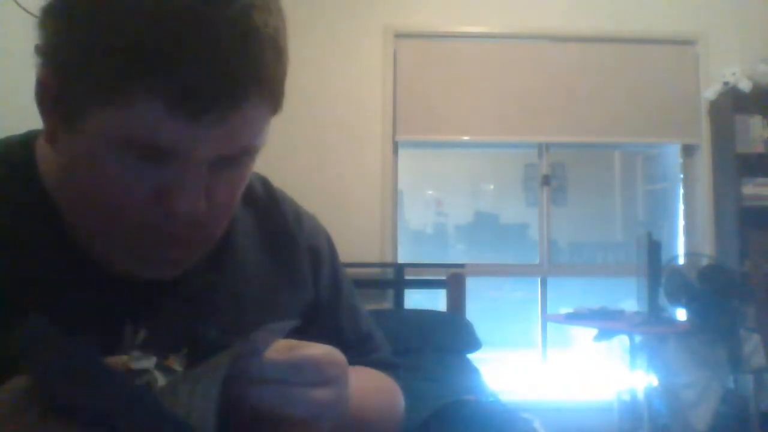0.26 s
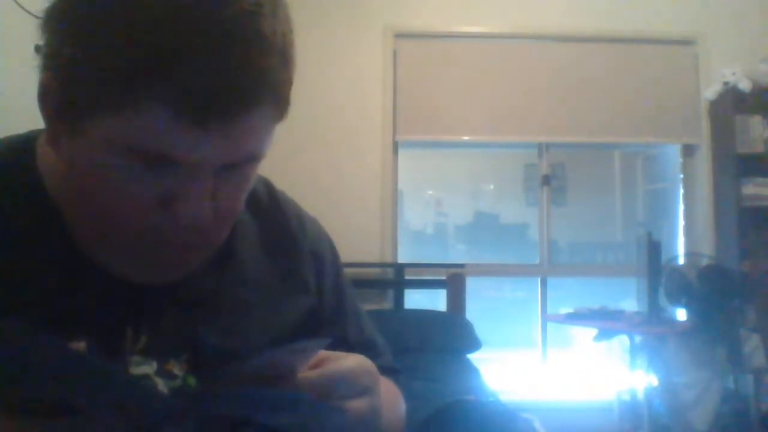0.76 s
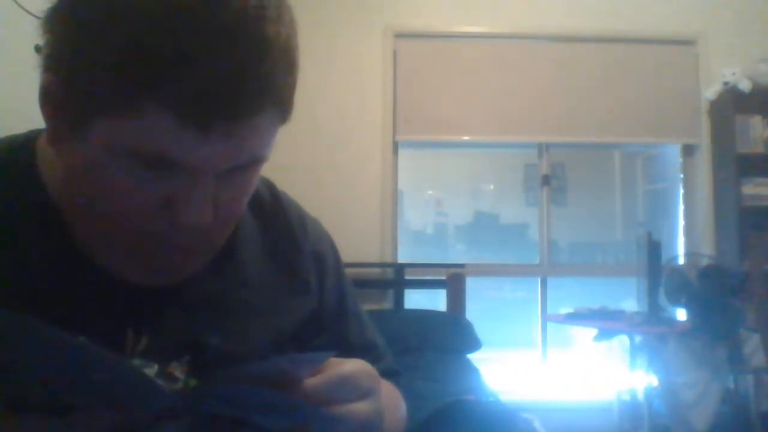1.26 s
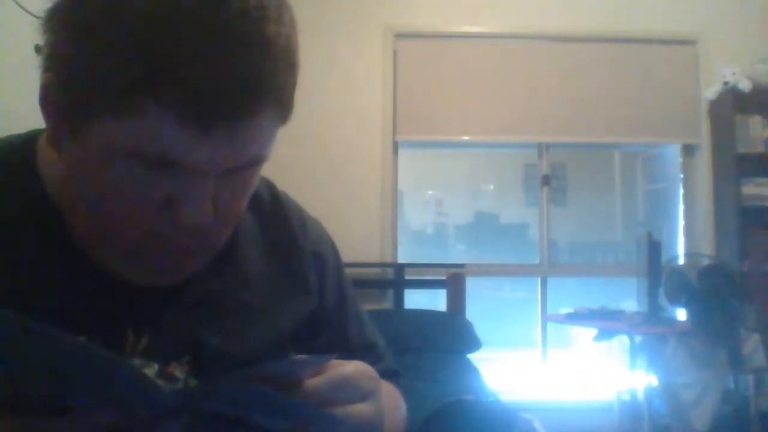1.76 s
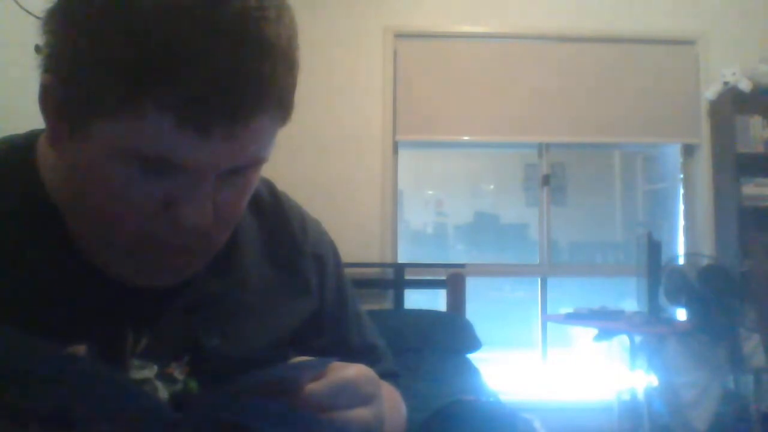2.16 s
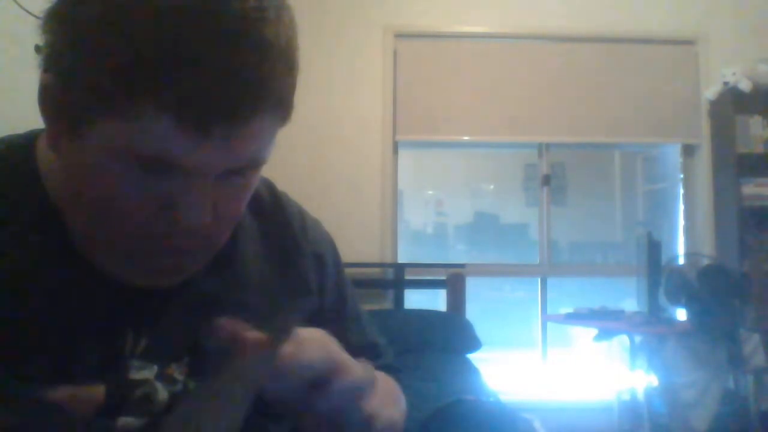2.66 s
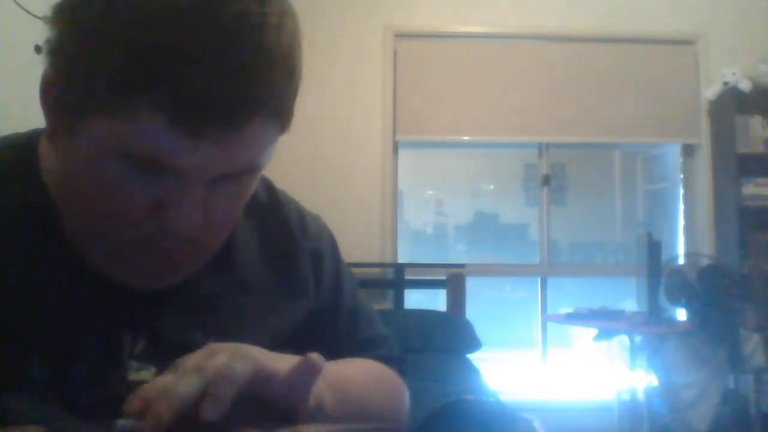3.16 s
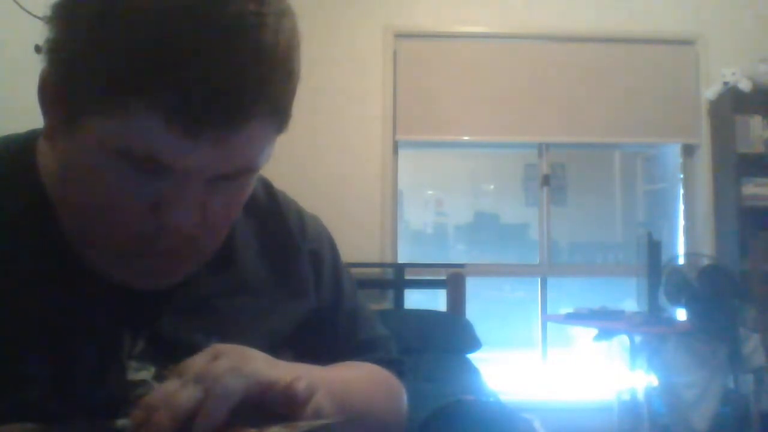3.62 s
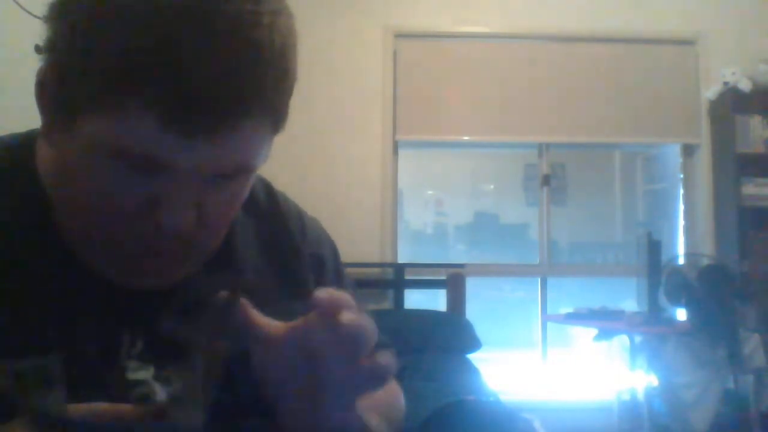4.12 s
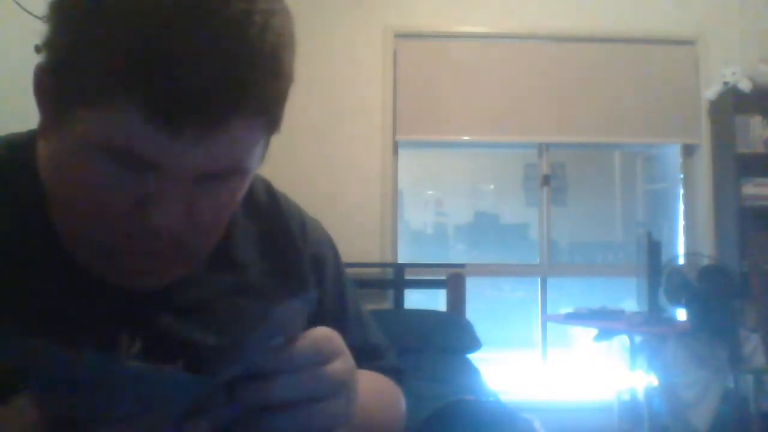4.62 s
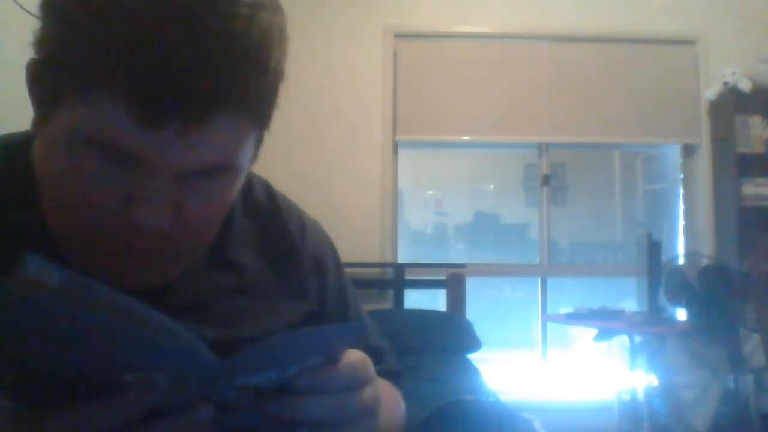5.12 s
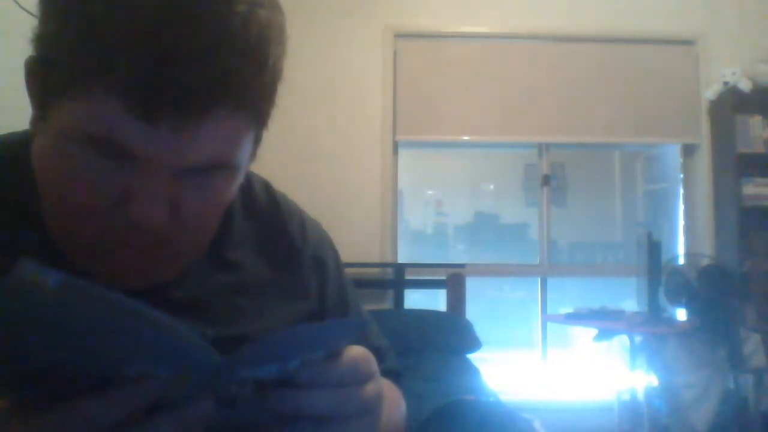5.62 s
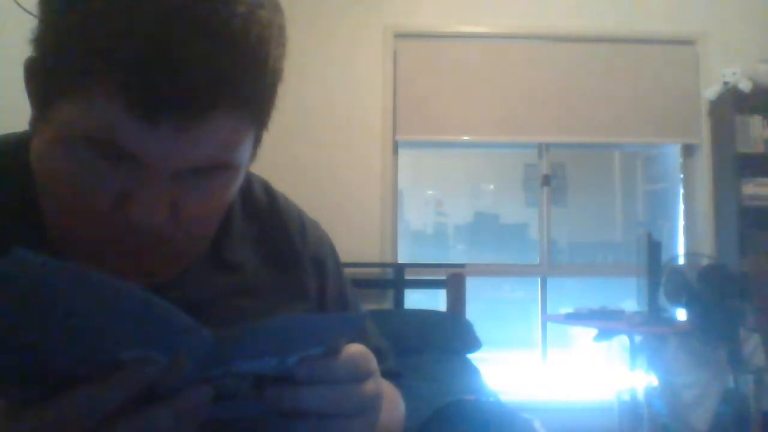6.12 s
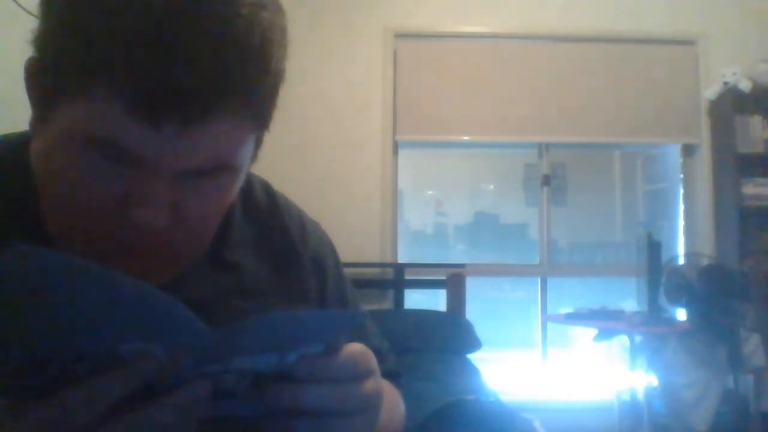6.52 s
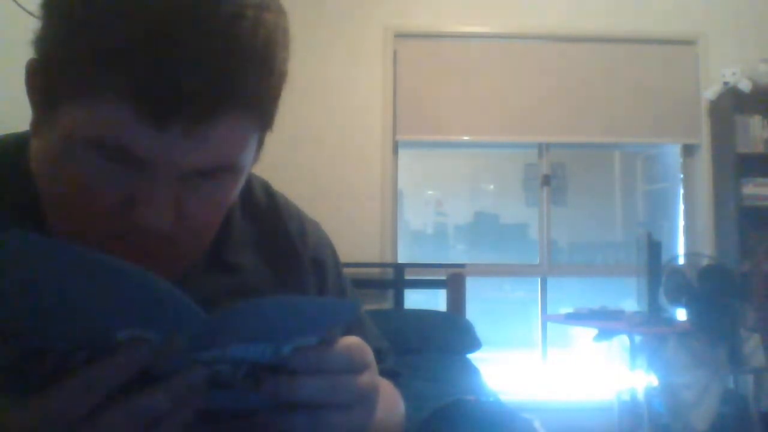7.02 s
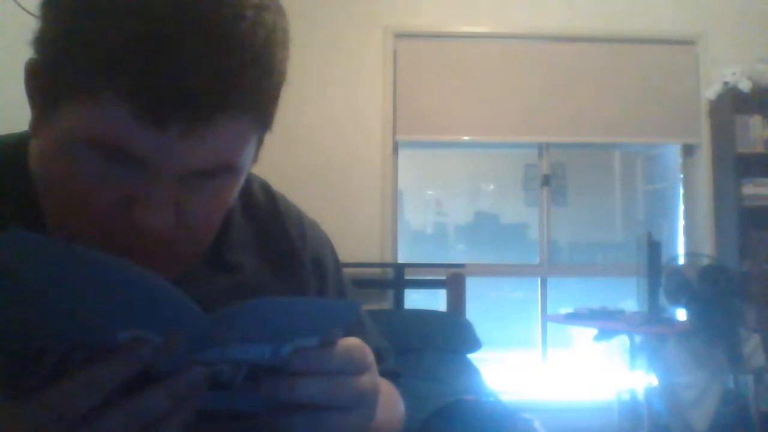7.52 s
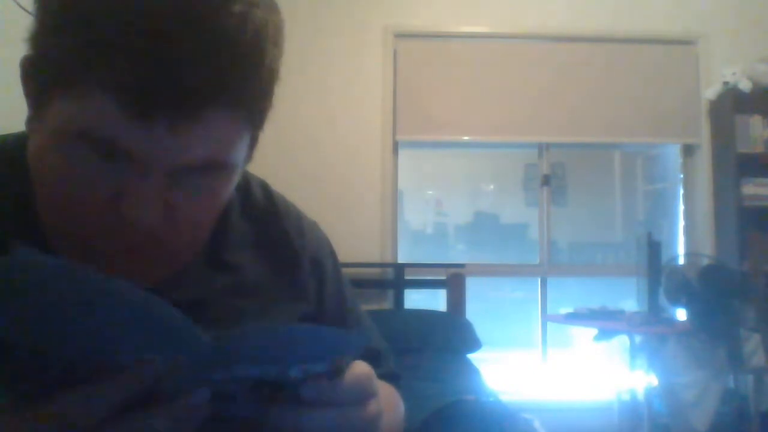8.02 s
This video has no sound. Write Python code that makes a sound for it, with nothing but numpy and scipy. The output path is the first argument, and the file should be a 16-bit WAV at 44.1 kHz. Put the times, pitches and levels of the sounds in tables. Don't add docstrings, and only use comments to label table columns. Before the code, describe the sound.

A continuous low computer hum with a slow regular throb and a gritty, fluttering fan rattle, taken by a built-in microphone in the same case. Short sags in the hum recur throughout. Tiny papery crinkles appear mainly in the first five seconds as magazine pages are handled, with a few dull desk bumps. Faint distant engine, very high whine and soft hiss remain in the background.

```python
import sys
import numpy as np
from scipy import signal
from scipy.fft import rfft, irfft
from scipy.io import wavfile
from scipy.ndimage import uniform_filter1d

SR = 44100
rng = np.random.default_rng(int(sys.argv[2]) if len(sys.argv) > 2 else 0)


def put_to_file(sound):
    columns = np.atleast_2d(sound).T
    safe = np.clip(columns, -1, 1)
    whole_steps = np.round(safe * 32767)
    wavfile.write(sys.argv[1], SR, whole_steps.astype(np.int16))


def volts(x):
    e = np.asarray(x, float) / 20
    return 10 ** e


N = 365148
TIME = np.arange(N) / SR

FAN_HZ = 59.63
# (time [s], lead [turns])
FAN_LEAD = [(0.0, -.023), (.2, -.023), (.6, -.053), (1.6, .042), (1.8, .044), (2.2, .042), (2.75, .012),
            (3.6, .088), (4.0, .068), (4.6, .041), (5.0, -.019), (5.4, -.057), (5.6, -.055), (5.85, -.037),
            (6.3, -.047), (6.7, -.08), (7.6, -.085), (8.28, -.009)]
# (multiple of the turning rate, level [dB rms], share that follows the loose bearing [0-1])
FAN_ORDERS = [(1, -51, 0), (2, -60, .2), (3, -64, 1), (4, -60.5, 1), (5, -59.5, .5), (6, -41.5, 1),
              (7, -54, 1), (8, -55.5, 1), (9, -54, .2), (10, -60.5, 1), (11, -68, .5), (12, -58, .2),
              (13, -59.5, 1), (14, -62.5, 1), (15, -56.5, 1), (16, -60.5, 1), (17, -67.5, .7),
              (18, -67.5, .7), (19, -71, .7), (20, -70, .7), (32, -71, .1), (35, -75, .1), (38, -73, .1),
              (43, -76, .1)]
MOUNT_ORDER, LID_ORDER, LID_LAG_TURNS = 5, 14, .7
PLAY_TURNS, PLAY_HZ = 0.00033, 24
BUZZ_FOLLOWS = 0.14

# (time [s], length [s], flutter [Hz])
STUMBLES = [
    (0.674, 0.021, 26.8),
    (1.15, 0.036, 26.6),
    (1.963, 0.05, 24),
    (2.754, 0.045, 26),
    (3.537, 0.033, 24),
    (4.941, 0.055, 23.5),
    (5.614, 0.055, 24),
    (7.012, 0.064, 24.3),
]
STUMBLE_PLAY_TURNS = .027
STUMBLE_LOSS = .55
STUMBLE_SLACK = .45
FLUTTER_ABOVE_DB, FLUTTER_BELOW_DB, FLUTTER_GLIDE = -45.5, -51, 340

# (centre [Hz], width [Hz])
PANELS = [(230, 60), (362, 60), (445, 40), (575, 60), (870, 80), (1080, 150), (1410, 200), (2570, 60),
          (4140, 330), (4400, 150)]
PANEL_DB = [-69.5, -56.5, -68, -62.5, -60, -64.5, -61, -68, -72, -100]

# (time [s], peak level [dB])
HARD_KNOCKS = [(.005, -37.6), (.374, -37.2), (.576, -37.2), (1.715, -37.3), (1.799, -35.8), (1.832, -36.4),
               (2.05, -36.7), (2.772, -36.7), (3.525, -36), (3.995, -37.2), (4.163, -36.7), (4.197, -36.9),
               (4.247, -36.2), (4.448, -37.2), (4.499, -36.6), (4.666, -36.9), (4.751, -37.3),
               (4.868, -37.3), (5.003, -37), (5.506, -37.1), (5.641, -36.9), (5.875, -36.2), (6.53, -37.2),
               (7.05, -36.7), (7.385, -36.1), (7.62, -37), (7.821, -37.3), (7.988, -37.1), (8.089, -36.4),
               (8.122, -36.8)]
# (start [s], end [s])
SETTLED = [(.06, .26), (2.07, 2.57), (3.59, 3.85), (5.02, 5.28), (6.3, 6.42), (6.55, 6.68), (7.11, 7.33),
           (7.42, 7.5)]
USUAL_KNOCK_DB, MISSED_KNOCK_DB, LOOSE_TOP_DB = -43.5, -58, -38
LOOSE_SPREAD, SETTLED_SPREAD = .5, .12
REBOUND, REBOUND_LATE = .7, .3
KNOCK_TURN, KNOCK_GAIN_DB = .285, 28.5
KNOCK_JITTER_S, KNOCK_RISE_S = .00007, .0007

# (centre [Hz], width [Hz])
CASE = [(1915, 130), (2260, 220), (2570, 110), (2950, 260), (3160, 200), (3510, 200), (4150, 140),
        (5200, 300)]
# (after a hard knock [dB], after a soft knock [dB])
CASE_DB = [(-5.5, -2), (-4.5, -11.5), (-1, -6), (-6, -2), (-8, -0.5), (-6.5, -8), (-10.5, -22), (-22, -28)]
CASE_LATE_S = [0, 0, 0, .001, .0015, 0, .002, 0]
# (delay [s], level [dB])
CASE_ECHOES = [
    (.00288, -4),
    (.0047, -5.5),
    (.011, -10),
]
# (centre [Hz], width [Hz], delay [s], level [dB])
LID = [
    (865, 220, 0.00459, -5.5),
    (1300, 750, 0.00427, -29),
]

# (frequency [Hz], level [dB per Hz])
AIR = [(20, -81.5), (60, -81.5), (140, -81.5), (300, -90.5), (500, -83.5), (660, -85.5), (1000, -82.5),
       (1250, -87), (1750, -90.5), (2400, -87.5), (3500, -100), (3750, -110), (4600, -116)]
RATTLE_ABOVE_HZ, RATTLE_FOLLOWS = 1940, 0.44

SPINDLE_HZ = [
    86.672,
    90.13,
    99.94,
]
SPINDLE_DB = [-47, -48, -69]
IN_STEP_S = 0.0622

# (time [s], peak level [dB], frequency [Hz])
THUMPS = [(0.83, -48, 140), (1.13, -50, 136), (2.134, -47, 133), (2.729, -52, 140), (3.2, -53, 136),
          (3.519, -47, 138), (4.952, -44, 136), (6.25, -45, 135), (7.021, -52, 141), (7.28, -48, 142),
          (7.61, -48, 140), (7.65, -50, 140)]

REFRESH_HZ, REFRESH_S = 59.7615, .0141
# (frequency [Hz], level [dB per line])
SPIKE = [(10500, -104), (10900, -90), (11250, -88), (11470, -94), (11800, -87), (12150, -96), (12450, -94),
         (12970, -80), (13240, -85), (13450, -79), (13900, -78), (14100, -84), (14280, -94), (14500, -92),
         (14850, -106)]
WHINE_HZ = [11152.26, 12609.06, 12847.74, 14304.53]
WHINE_DB = [-73, -74, -71, -83]
BLANK_HZ, BLANK_S, BLANK_SHARE = 30.015, .0083, .16

# (time [s], firing tone [Hz], level [dB rms])
ENGINE = [(0, 59.7, -52), (.2, 64.7, -44), (.35, 65.7, -56), (.65, 79, -61), (1.15, 78.6, -56),
          (2.5, 79.3, -56), (2.85, 77.5, -57), (3.2, 69.6, -74), (3.5, 46.6, -76), (3.62, 45.3, -50),
          (3.85, 43.7, -45), (4.25, 48, -50), (4.42, 50, -67), (4.6, 54.2, -51), (4.72, 59.6, -69),
          (5.05, 77, -63), (5.8, 85.5, -74), (8.28, 89, -83)]
# (time [s], length [s], level of the dull part around 3.4 kHz [dB], level of the bright part
# around 13 kHz [dB])
RUSTLES = [(0.045, 0.045, -74, -67), (0.656, 0.0098, -61.5, -61), (2.535, 0.045, -72, -61),
           (2.7, 0.021, -76, -65), (3.065, 0.022, -69, -61), (3.809, 0.014, -75, -66),
           (3.89, 0.024, -68, -63), (4.321, 0.0036, -57, -57), (4.364, 0.034, -73, -67),
           (4.557, .04, -83, -66), (4.807, 0.025, -69, -65)]
# (frequency [Hz], level [dB per Hz])
HISS = [(3000, -108), (5000, -110), (7500, -112), (10000, -112), (11300, -108), (12300, -107),
        (13500, -105), (14800, -110), (16000, -109)]


def in_time(rows):
    s, *columns = np.transpose(rows)
    return [np.interp(TIME, s, c) for c in columns]


def bump(at, length):
    return np.exp(-.5 * ((TIME - at) / length) ** 2)


def resonate(x, hz, width_hz):
    r = np.exp(-np.pi * width_hz / SR)
    poles = [1, -2 * r * np.cos(2 * np.pi * hz / SR), r * r]
    return signal.lfilter([(1 - r * r) / 2, 0, (r * r - 1) / 2], poles, x)


def resonate_twice(x, hz, width_hz):
    return resonate(resonate(x, hz, width_hz), hz, width_hz)


def coloured(spectrum):
    hz, db = np.transpose(spectrum)
    grid = np.fft.rfftfreq(N, 1 / SR) + 1
    gain = volts(np.interp(np.log(grid), np.log(hz), db)) * np.sqrt(SR / 2)
    return irfft(rfft(rng.standard_normal(N)) * gain, N)


def unit_band(hz, width_hz):
    band = resonate_twice(rng.standard_normal(N), hz, width_hz)
    return band / band.std()


def tones(hz_list, db_list, wave, time):
    return sum(np.sqrt(2) * volts(db) * wave(2 * np.pi * hz * time) for hz, db in zip(hz_list, db_list))


def knock_force(s, chance):
    settled = sum((s > start) & (s < end) for start, end in SETTLED)
    push = np.where(settled, SETTLED_SPREAD, LOOSE_SPREAD) * chance
    push -= STUMBLE_SLACK * sum(abs(s - at) < length for at, length, hz in STUMBLES)
    hard = {np.argmin(abs(s - at)): volts(db - USUAL_KNOCK_DB) - 1 for at, db in HARD_KNOCKS}
    least = volts(MISSED_KNOCK_DB - USUAL_KNOCK_DB) - 1
    most = volts(LOOSE_TOP_DB - USUAL_KNOCK_DB) - 1
    excess = np.zeros(len(s) + 2)
    for k in range(len(s)):
        free = push[k] - REBOUND * (excess[k - 1] + hard.get(k + 1, 0)) - REBOUND_LATE * excess[k - 2]
        excess[k] = hard.get(k, np.clip(free, least, most))
    return USUAL_KNOCK_DB + 20 * np.log10(1 + excess[:-2])


def panel_hum(part):
    return sum(volts(db) * unit_band(hz, width) for (hz, width), db in zip(PANELS[part], PANEL_DB[part]))


def fan_hum(turns, force_db):
    stumble, flutter = 0, 0
    for s, length, hz in STUMBLES:
        since = TIME - s
        spell = np.exp(-.5 * (since / length) ** 4)
        stumble = stumble + spell
        flutter = flutter + spell * np.exp(2j * np.pi * (hz + FLUTTER_GLIDE / 2 * since) * since)
    sides = volts(FLUTTER_ABOVE_DB) * flutter + volts(FLUTTER_BELOW_DB) * flutter.conj()
    out = np.sqrt(2) * np.real(sides * np.exp(2j * np.pi * 6 * turns))

    shake = (PLAY_TURNS + STUMBLE_PLAY_TURNS * stumble) * unit_band(PLAY_HZ, 42.3)
    knock_turns = np.arange(len(force_db)) + KNOCK_TURN + LID_LAG_TURNS / 2
    buzz = volts(BUZZ_FOLLOWS * np.interp(turns, knock_turns, force_db - USUAL_KNOCK_DB))
    for k, db, loose in FAN_ORDERS:
        lag = np.arctan(3 * (k - MOUNT_ORDER)) - np.pi / 2
        lid_turns = .19 * np.clip(k - LID_ORDER + 2, 0, 2) + LID_LAG_TURNS * max(k - LID_ORDER, 0)
        lag += 2 * np.pi * lid_turns
        height = np.sqrt(2) * volts(db) * (1 - loose * STUMBLE_LOSS * stumble)
        if k >= LID_ORDER - 2:
            height = height * buzz
        out += height * np.cos(2 * np.pi * k * (turns + loose * shake) - lag)
    return out + panel_hum(slice(0, 6)) + panel_hum(slice(6, None)) * buzz ** 2


def fan_knocks(at, peak_db):
    chance = rng.standard_normal((len(at), len(CASE) + 1))
    hardness = np.clip((peak_db + 44.5) / 5, 0, 1)
    at = at + np.round(SR * (KNOCK_JITTER_S * chance[:, 0] - KNOCK_RISE_S)).astype(int)
    chance[:, 1:] += 2 * uniform_filter1d(chance[:, 1:], size=9, axis=0)

    rings = []
    for k, ((hz, width_hz), (hard_db, soft_db)) in enumerate(zip(CASE, CASE_DB)):
        ring_db = soft_db + hardness * (hard_db - soft_db) + 1.8 * chance[:, k + 1]
        clicks = np.full(N, 1e-18)
        clicks[at + round(CASE_LATE_S[k] * SR)] = volts(peak_db + ring_db + KNOCK_GAIN_DB)
        ring = resonate(resonate(clicks, hz, width_hz), hz, 800 if k < 3 else 450)
        rings.append(ring * (-1) ** k)
    echoing = sum(rings[:4]) + 0.21 * sum(rings[4:])
    out = sum(rings)
    for delay, db in CASE_ECHOES:
        out = out - volts(db) * np.roll(echoing, round(delay * SR))

    clicks = np.full(N, 1e-18)
    clicks[at] = hardness * volts(peak_db + KNOCK_GAIN_DB)
    for hz, width_hz, delay, db in LID:
        out = out + volts(db + 10.5) * np.roll(resonate_twice(clicks, hz, width_hz), round(delay * SR))
    return out


def fan_air(at, force_db):
    noise = coloured(AIR)
    highpass = signal.butter(2, RATTLE_ABOVE_HZ, "high", fs=SR, output="sos")
    bright = signal.sosfiltfilt(highpass, noise)
    last = np.clip(np.searchsorted(at, np.arange(N)) - 1, 0, None)
    rattle = uniform_filter1d(volts(RATTLE_FOLLOWS * (force_db[last] - USUAL_KNOCK_DB)), size=90)
    return noise + bright * (rattle - 1)


def fan():
    turns = FAN_HZ * TIME + in_time(FAN_LEAD)[0]
    at = np.searchsorted(turns, np.arange(int(turns[-1])) + KNOCK_TURN)
    force_db = knock_force(TIME[at], rng.standard_normal(len(at)))
    return fan_hum(turns, force_db) + fan_knocks(at, force_db) + fan_air(at, force_db)


def spindles():
    return tones(SPINDLE_HZ, SPINDLE_DB, np.cos, TIME - IN_STEP_S)


def thumps():
    return sum(volts(db) * bump(s, .015) * np.cos(2 * np.pi * hz * (TIME - s)) for s, db, hz in THUMPS)


def refresh_and_whines():
    lines = np.arange(2049) * REFRESH_HZ
    heights = volts(np.interp(lines, *np.transpose(SPIKE), left=-150, right=-150))
    late_s = .0017 * (abs(lines - 12770) < 470)
    cycle = irfft(heights * np.exp(-2j * np.pi * lines * late_s)) * 2048 * np.sqrt(2)
    place = (TIME - REFRESH_S) * REFRESH_HZ % 1 * 4096
    spikes = np.interp(place, np.arange(4097), np.append(cycle, cycle[0]))

    from_gap = abs(((TIME - BLANK_S) * BLANK_HZ + .5) % 1 - .5)
    gate = uniform_filter1d(1. * (from_gap > BLANK_SHARE / 2), size=60)
    return spikes + gate * tones(WHINE_HZ, WHINE_DB, np.sin, TIME) / (1 - BLANK_SHARE)


def engine():
    hz, db = in_time(ENGINE)
    return np.sqrt(2) * volts(db) * np.sin(2 * np.pi * np.cumsum(hz) / SR)


def paper():
    dull = sum(volts(db) * bump(s, length) for s, length, db, top_db in RUSTLES)
    bright = sum(volts(top_db) * bump(s, length) for s, length, db, top_db in RUSTLES)
    snaps = volts(4.5 * unit_band(120, 200) - 2.5)
    return snaps * (dull * unit_band(3400, 7700) + bright * unit_band(12900, 4500))


def circuit_hiss():
    return coloured(HISS)


def scene():
    computer = fan() + spindles() + thumps() + refresh_and_whines()
    room = engine() + paper()
    return (computer + room + circuit_hiss())[None]


def roll_off(x):
    return signal.sosfilt(signal.butter(12, 15690, fs=SR, output="sos"), x)


def record(dry):
    return roll_off(dry)


dry = scene()
out = record(dry)
put_to_file(out)
```